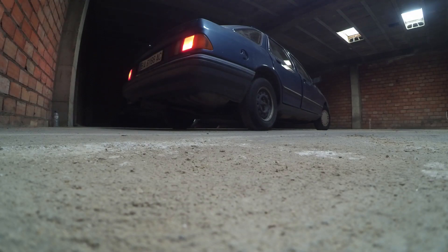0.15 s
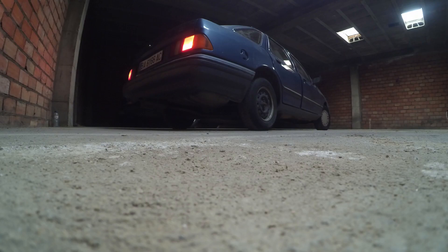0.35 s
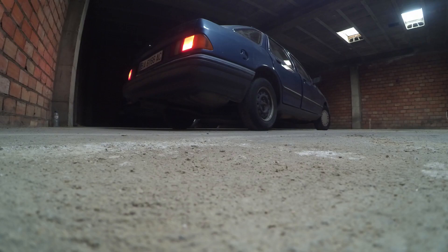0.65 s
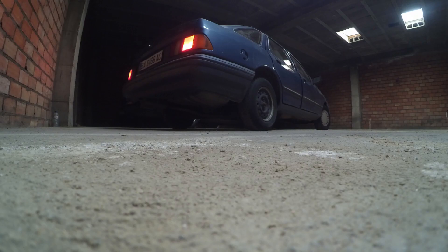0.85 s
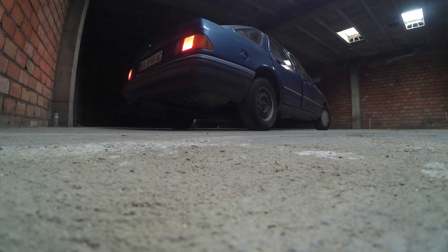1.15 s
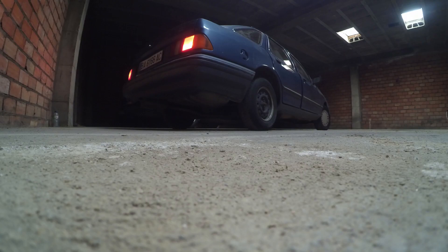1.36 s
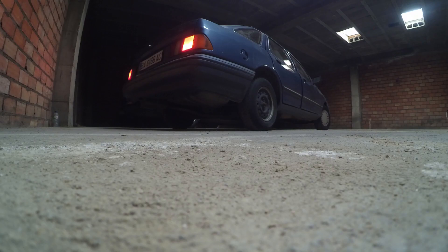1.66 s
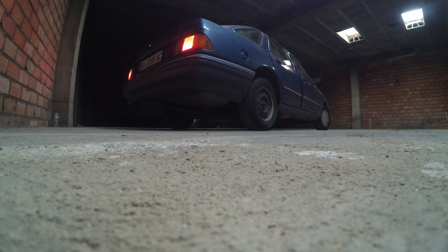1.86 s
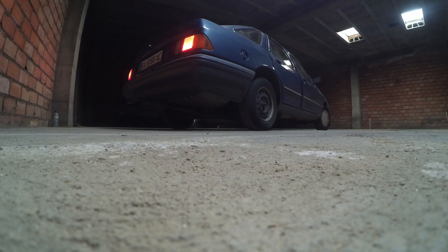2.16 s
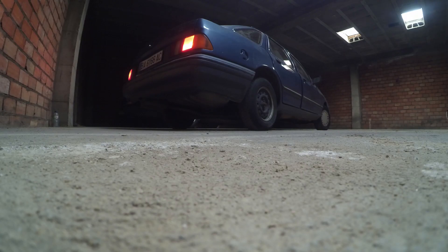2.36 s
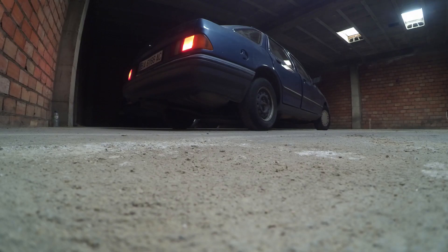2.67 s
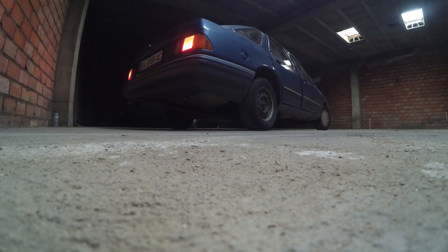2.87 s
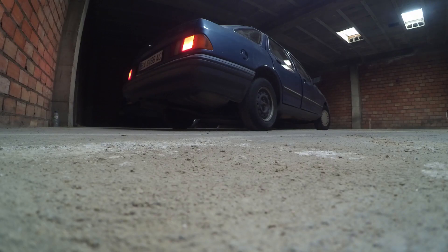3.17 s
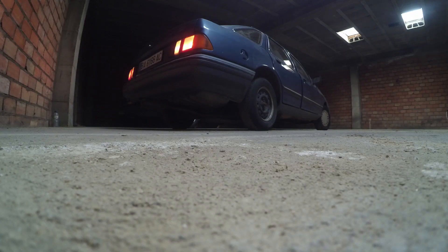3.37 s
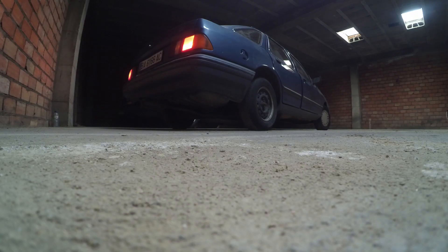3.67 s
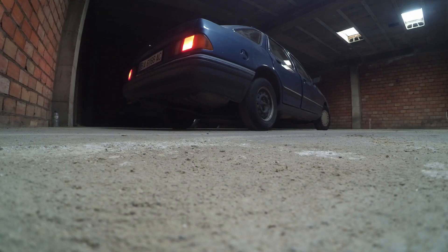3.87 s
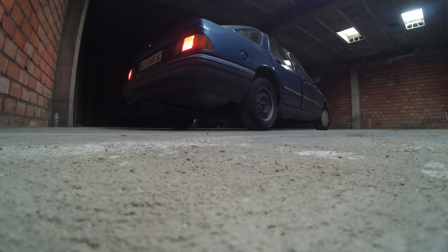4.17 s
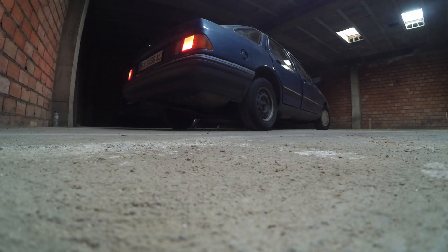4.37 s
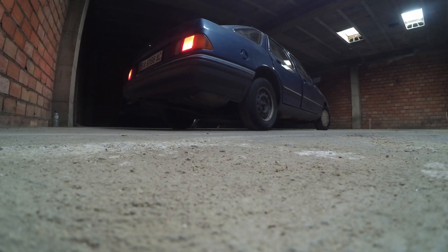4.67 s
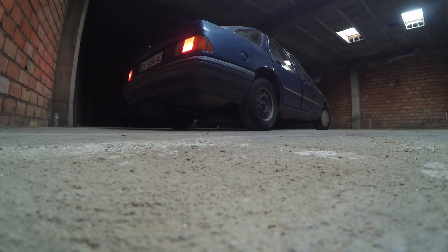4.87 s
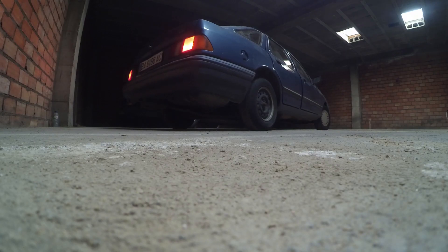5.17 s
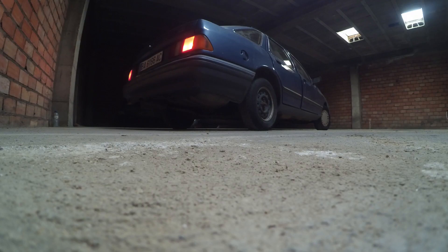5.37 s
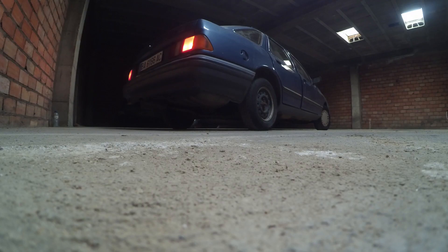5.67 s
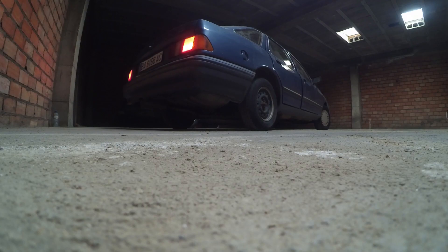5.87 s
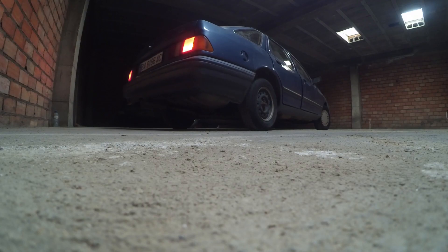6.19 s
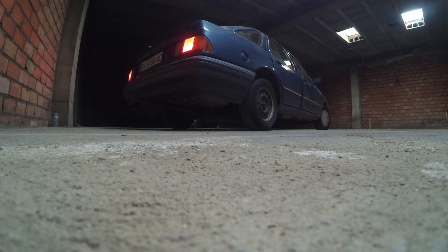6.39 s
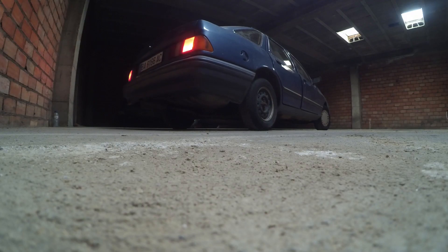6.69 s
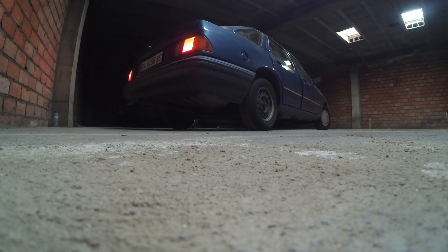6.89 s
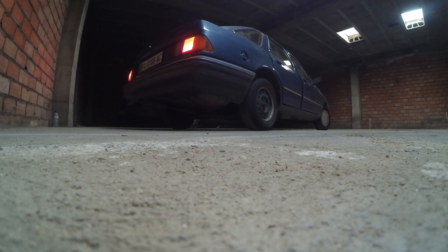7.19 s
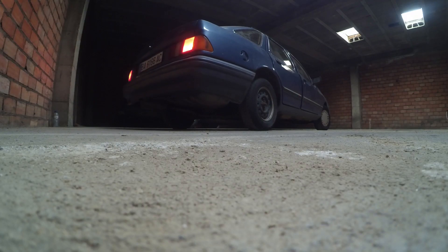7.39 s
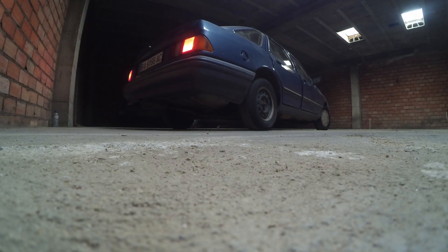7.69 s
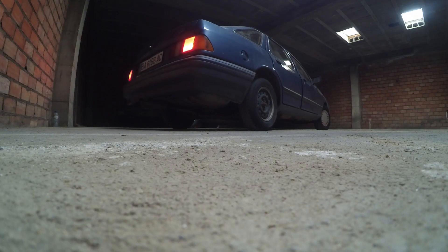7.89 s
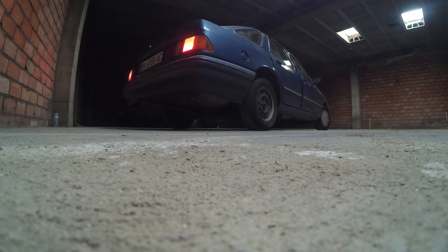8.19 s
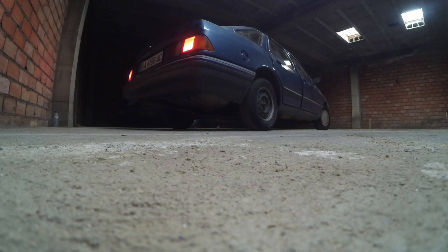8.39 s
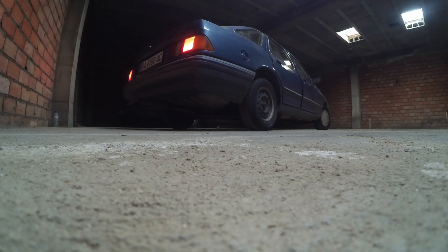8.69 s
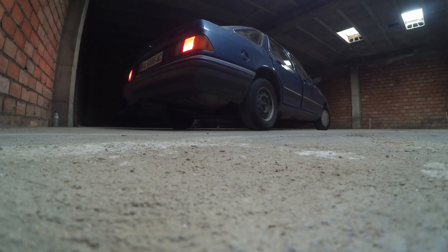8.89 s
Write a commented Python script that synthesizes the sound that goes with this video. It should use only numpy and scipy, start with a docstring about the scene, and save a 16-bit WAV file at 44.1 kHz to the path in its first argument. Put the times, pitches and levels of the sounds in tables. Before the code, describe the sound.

An old petrol engine idles unevenly in a brick garage, sags near stalling, catches with a booming surge, then settles lower before a loud clack.

```python
"""An old four-cylinder petrol engine idles unevenly in a brick garage, heard from the floor behind the car.
First the exhaust booms on multiples of a hunting firing rate, over bay hiss, ticks and a fuzzy whistle.
Filtered noise makes the hiss and scattered clacks of pedals and levers; tones make the boom and whistle.
From about five seconds it sags under load, catches with a burst of boom that clips, and surges.
It settles to a lower idle, and the loudest clacks, noise bursts with a garage echo, come near the end."""
import sys
import numpy as np
from scipy import signal
from scipy.io import wavfile
from scipy.ndimage import uniform_filter1d

SR = 44100
rng = np.random.default_rng(int(sys.argv[2]) if len(sys.argv) > 2 else 0)


def dump(signal):
    """Clip the signal to [-1, 1] and save it as 16-bit WAV at the path in sys.argv[1]."""
    limited = np.clip(np.atleast_2d(signal).T, -1, 1)
    pcm = np.round(limited * 32767).astype(np.int16)
    wavfile.write(sys.argv[1], SR, pcm)


N = 398663

SURGE_S, SURGE_RISE_S, SURGE_FALL_S = 5.96, 0.14, 0.053  # the throttle opens and closes again


def gain_of(db):
    """Decibels to gain."""
    return 10 ** (np.asarray(db) / 20)


def evened(x):
    """Scales to rms 1."""
    return x / np.sqrt(np.mean(x ** 2) + 1e-20)


def read(points, hz):
    """Reads a curve over frequency at hz, straight between points on a log axis."""
    f, value = np.transpose(points)
    return np.interp(np.log(hz + 1), np.log(f + 1), value)


def columns(rows):
    """Draws every column of a table over time as a curve with one value per sample."""
    s, *values = np.transpose(rows)
    return [np.interp(np.arange(N) / SR, s, v) for v in values]


def bump(s, rise, fall):
    """A smooth hump of height 1 around s, with its own half length on each side."""
    t = np.arange(N) / SR - s
    return np.exp(-(t / np.where(t < 0, rise, fall)) ** 2)


def drift(seconds):
    """Slow random wander of rms 1: white noise averaged twice over the given time."""
    size = max(round(seconds * SR), 1)
    once = uniform_filter1d(rng.standard_normal(N), size)
    return evened(uniform_filter1d(once, size))


def colour(x, points, rings=()):
    """Filters by a spectrum with resonant humps, causally (minimum phase) and with unit energy."""
    hz = np.abs(np.fft.fftfreq(65536, 1 / SR))
    humps = sum(d / (1 + (2 * (hz - f) / width) ** 2) for f, width, d in rings)
    db = read(points, hz) + humps
    log_gain = np.log(gain_of(np.maximum(db, -100)))
    phase = -signal.hilbert(log_gain).imag
    taps = np.fft.ifft(np.exp(log_gain + 1j * phase)).real[:32768]
    return signal.oaconvolve(x, taps / np.linalg.norm(taps))[:len(x)]


def whine():
    """A fuzzy whistle: one narrow tone, wavering in pitch and level, that comes and goes."""
    # spells at full level: [start t/s, length/s, level/dB]
    spells = [(0.195, 0.58, -51), (1.06, .12, -49.5), (1.47, 0.07, -45), (1.743, 0.83, -50.5),
              (2.7, 0.32, -49.5), (3.273, .06, -48), (3.694, 0.96, -48)]
    whistle_hz, edge_s = 981, 0.075  # each spell fades in before it and out after it
    t = np.arange(N) / SR
    level = np.zeros(N)
    for s, length, db in spells:
        inside_s = np.minimum(t - s, s + length - t)
        level += gain_of(db) * np.clip(inside_s / edge_s + 1, 0, 1) ** 2
    cycles = np.cumsum(whistle_hz * (1 + 0.0054 * drift(0.0285))) / SR
    return level * gain_of(2.2 * drift(0.026)) * np.sqrt(2) * np.sin(2 * np.pi * cycles)


def engine_bay(hz, turns):
    """Belt and intake noise; its treble pulses with each firing, and one valve in four ticks harder."""
    # shape of the bay noise: [f/Hz, relative level/dB per Hz]
    bay_shape = [(110, -28), (190, -8.5), (245, -8.5), (300, -15.5), (450, -11.5), (570, -11), (760, -11),
                 (950, -9), (1900, -20.5), (2700, -21), (3700, -24), (7400, -27), (12000, -41),
                 (14000, -44), (15200, -65)]
    # sheet-metal and garage resonances on it: [f/Hz, width/Hz, height/dB]
    bay_rings = [(235.5, 34, 6), (358.4, 30, 8.5), (653, 77, 6.5), (772, 6.2, 3), (860, 6.7, 5.5),
                 (1131, 35, 3.5), (1311, 15, 6.5), (1497, 77, 4.5), (1765, 24, 7.5), (1996, 45, 3),
                 (2600, 60, 2), (2770, 19, 6.5), (5840, 130, 3), (7430, 230, 2)]
    # the bay falls quiet just before the engine catches: [t/s, level change/dB, half length/s]
    stall_s, stall_db, half = (5.76, -7.5, 0.026)
    # the intake rushes after the firings catch: [t/s, level change/dB, rise/s, fall/s]
    rush_s, rush_db, rise, fall = (6.04, 3.4, 0.16, 0.13)
    level_db = -39.5 + 0.21 * (hz - 36)  # at 36 firings a second, and its change with speed
    level_db = level_db + rush_db * bump(rush_s, rise, fall) + stall_db * bump(stall_s, half, half)
    treble_db = 0.44 - 0.09 * (hz - 36)

    noise = colour(rng.standard_normal(N), bay_shape, bay_rings)
    low = signal.sosfilt(signal.butter(2, 2500, fs=SR, output="sos"), noise)
    # reversed noise keeps the ticks independent of the hiss
    top = signal.sosfilt(signal.butter(3, 6500, "high", fs=SR, output="sos"), noise[::-1])
    middle = signal.sosfilt(signal.butter(2, (300, 2000), "band", fs=SR, output="sos"), noise)
    middle_level = np.sqrt(np.mean(middle ** 2))

    firing_chance, valve_chance = rng.standard_normal((400, 2)).T
    firing_gain = gain_of(3.3 * firing_chance[turns.astype(int)])
    pulse = 0.82 + 0.41 * firing_gain * np.exp(-(turns % 1) / 0.65)
    valve_gain = gain_of(3 * valve_chance[(turns // 4).astype(int)])
    tick = 1.3 * valve_gain * np.exp(-(turns % 4) / 0.9)

    hiss = (noise - low) * evened(pulse) * gain_of(treble_db + 0.44 * drift(0.041))
    wavering_low = low * gain_of(drift(0.014))
    return gain_of(level_db) * (wavering_low + hiss + top * tick) / middle_level


def garage(x):
    """Echo of the room: sparse taps of random sign, each band dying at its own speed."""
    # reverberation: [f/Hz, t60/s]
    decay = [(200, 0.64), (1000, 0.72), (4000, 0.4), (12000, 0.29)]
    taps = np.zeros(SR)
    at = np.arange(300, SR - 20, 20)
    taps[at + rng.integers(0, 20, len(at))] = rng.choice([-1., 1.], len(at))
    hz, t, z = signal.stft(taps, SR, nperseg=256)
    fade_db = -60 * t / read(decay, hz)[:, None]
    tail = signal.istft(z * gain_of(fade_db), SR, nperseg=256)[1]
    return signal.fftconvolve(x, tail / np.linalg.norm(tail))[:N]


def clacks():
    """Pedals and levers: each clack is a short rattle of metal parts and a thud of the panels."""
    # hits, levels before the envelope: [t/s, bright level/dB, body over bright/dB, decay time constant/s]
    hits = [(3.289, -33, -8, 0.0084), (3.324, -29, 1.5, 0.013), (3.871, -37.5, 10, 0.017),
            (4.853, -32.5, 0, 0.011), (4.889, -35.5, 6, 0.012), (5.693, -40, -4, 0.027),
            (5.887, -36, 4, 0.01), (6.54, -39, 5, 0.0088), (7.815, -56, 32, 0.0087), (8.157, -48, 19, 0.04),
            (8.197, -26.5, 5, 0.019), (8.207, -20, 4, 0.02), (8.225, -22.5, 4.5, 0.019),
            (8.254, -24.5, 5, 0.021), (8.286, -31.5, 0.5, 0.045)]
    # bright part of a clack: [f/Hz, relative level/dB per Hz]
    metal = [(710, -24.5), (1200, -14), (1510, -2.5), (1650, -2), (2020, 2), (3570, -4.5), (4010, -2.5),
             (4800, -2.5), (5690, -1.5), (6670, -4), (15100, -23)]
    # resonances of the metal: [f/Hz, width/Hz, height/dB]
    metal_rings = [(3920, 350, 5), (5700, 560, 3)]
    # panel thud: [f/Hz, relative level/dB per Hz]
    body = [(90, -12), (140, -4), (185, -6), (230, 0), (270, -7), (330, 0.5), (390, 1), (430, -3), (480, 0),
            (600, -5), (850, -7), (1200, -12), (1700, -18), (2600, -36)]
    bright, dull, t = np.zeros(N), np.zeros(N), np.arange(8000) / SR
    attack = np.minimum(t / 0.0055, 1) ** 1.9
    for s, db, body_db, length in hits:
        at = round(s * SR)
        rattle = rng.standard_normal(len(t)) * attack * np.exp(-t / max(length, 0.001))
        bright[at:at + len(t)] += gain_of(db) * rattle
        dull[at:at + len(t)] += gain_of(db + body_db) * rattle
    return colour(bright, metal, metal_rings) + colour(dull, body)


def standing_waves(hz):
    """The garage's lowest tones, stirred by rough combustion, and low tones that ring on."""
    # irregular combustion between the lines: [f/Hz, relative level/dB per Hz]
    rumble_shape = [(8, -21), (18, -7), (36, 0.5), (60, 2.5), (100, 4), (130, -5.5), (200, -16.5),
                    (300, -45)]
    # standing waves on it, humps and slight dips: [f/Hz, width/Hz, height/dB]
    modes = [(17.3, 4.3, 1), (35.4, 1.8, -1), (51.6, 3.6, 16.5), (70.7, 2.2, -1)]
    # gain on the deep part of the rumble: [t/s, gain/dB]
    deep_gain = [(0, -33), (4.7, -13), (5, -22), (6, -17), (6.4, -22), (7.5, -20), (9.04, -26)]
    # low tones that start as the speed changes and ring on, near the firing rate or its multiples
    # and half: [start t/s, f/Hz, level before decay/dB, t60/s]
    ring_on = [(4.931, 50, -10, 0.75), (5.4, 65, -16, 0.78), (6.199, 35.6, -16.5, 2.2), (6.2, 17, -35, 2.1),
               (6.203, 67, -14, 0.67)]
    rumble = colour(rng.standard_normal(N), rumble_shape, modes)
    deep = signal.sosfiltfilt(signal.butter(4, 57, fs=SR, output="sos"), rumble)
    # the rest of the rumble falls towards the lower idle and swells through stumble and surge
    rough_db = -30 + 1.3 * (np.maximum(hz, 29) - 36)
    rough_db = rough_db + 13 * bump(SURGE_S, 6 * SURGE_RISE_S, SURGE_FALL_S)
    out = gain_of(columns(deep_gain)[0]) * deep + gain_of(rough_db) * (rumble - deep)
    for s, ring_hz, db, t60 in ring_on:
        t = np.maximum(np.arange(N) / SR - s, 0)
        envelope = gain_of(db - 60 * t / t60) * np.minimum(t / 0.05, 1)
        out = out + np.sqrt(2) * envelope * np.sin(2 * np.pi * ring_hz * t)
    return out


def overload_gain():
    """Brief gain on the exhaust that drives the boom into clipping."""
    # the burst of boom: [t/s, extra level/dB, half length/s]
    s, db, half = (5.924, 4.2, .016)
    return gain_of(db * bump(s, half, half))


def boom_levels(hz):
    """Levels in dB of the low multiples, as pipe and garage favour each speed, with dips and the surge."""
    # response: [firing rate f/Hz, then level/dB at 1, 2, 3, 1.5 and 0.5 times the rate]
    response = [(19.75, -15, -22.5, -17.5, -54, -41), (20.94, -16.5, -26, -13.5, -47, -45),
                (22.15, -33, -24.5, -25, -37, -57), (24.24, -23, -7, -21, -34, -55),
                (26, -19, -6.5, -22, -38, -43), (27.6, -35, -6, -20.5, -38.5, -35),
                (29.16, -27, -6.5, -18, -49, -42), (30.1, -52, -9, -19.5, -47, -42),
                (30.53, -54, -13, -24, -42, -41), (31.5, -14.5, -35, -27, -30, -31),
                (33.2, -21, -9.5, -24, -29, -27), (33.76, -12, -13, -21, -26, -31),
                (34.72, -10, -15, -21.5, -36.5, -36), (35.3, -10.5, -19.5, -22.5, -34, -47),
                (37.1, -12.5, -27.5, -23.5, -31, -43)]
    # dips of the lowest boom: [t/s, level change/dB, fall/s, recovery/s]
    boom_dips = [(1.14, -15, 0.23, .15), (1.86, -3.5, 0.1, 0.12), (3.28, -10, 0.12, .4)]
    lag_s = 0.039  # the garage answers a fall in speed late
    t = np.arange(N) / SR
    rate, *levels = np.transpose(response)
    heard_hz = np.maximum(np.interp(t - lag_s, t, hz), hz)
    first, second, third, uneven, half = (np.interp(heard_hz, rate, v) for v in levels)
    for s, db, fall, back in boom_dips:
        first = first + db / (1 + ((t - s) / np.where(t < s, fall, back)) ** 2)
    surge_uneven_db = 16.5 * bump(SURGE_S, SURGE_RISE_S, SURGE_FALL_S)
    return first, second, third, uneven + surge_uneven_db, half


def exhaust(hz, turns, first_db, second_db, third_db, uneven_db, half_db):
    """Clean multiples of the firing rate and half multiples from unequal cylinders."""
    # fourth and higher multiples after pipe and garage, before the trims below: [f/Hz, level/dB]
    pipe = [(78, -31), (92, -22), (101, -25), (111, -25), (117, -24.5), (123, -34.5), (136, -39.5),
            (144.5, -47), (148, -33), (153, -30.5), (168, -36.5), (186, -47), (207, -61), (222, -45.5),
            (237, -48.5), (243, -51.5), (255, -50), (300, -61)]
    # higher half multiples: [multiple of the firing rate, level over the one at 1.5/dB]
    halves = [(2.5, -15), (3.5, -24.5), (4.5, -20)]
    # a standing wave delays the lowest boom as the firing rate climbs through it
    lowest_hz, lowest_half_hz, memory_s = 35.2, 1.0, 0.25
    slow_hz = uniform_filter1d(hz, round(memory_s * SR))
    lowest_lag = 1 + 1.3 * np.arctan((slow_hz - lowest_hz) / lowest_half_hz)

    def tone(multiple, db):
        """One multiple of the firing rate at an rms level in dB, with its phase lag."""
        lag = np.pi / 3 * multiple ** 2  # pipe and garage smear each firing: higher multiples lag more
        if multiple > 3.9:
            lag = lag - 1.4
        if multiple == 1:
            lag = lag + lowest_lag
        return np.sqrt(2) * gain_of(db) * np.cos(2 * np.pi * multiple * turns - lag)

    boom = tone(1, first_db) + tone(2, second_db) + tone(3, third_db)
    boom += tone(1.5, uneven_db) + tone(0.5, half_db)
    fast_db = -3 * np.clip((hz - 34) / 2, 0, 1)  # the fourth multiple thins out at the fastest idle
    boom += tone(4, read(pipe, 4 * hz) + fast_db)
    dull_db = -2.2 * np.maximum(27 - hz, 0)  # slow, weak firings are blunter
    for k in range(5, 11):
        boom += tone(k, read(pipe, k * hz) + dull_db)
    for k, db in halves:
        boom += tone(k, uneven_db + db)
    return boom


def scene():
    """Exhaust, standing waves, engine bay, whistle and the clacks with their echo, on one speed curve."""
    # hunting idle, sag under load, surge, lower idle: [t/s, firing rate f/Hz]
    speed = [(0, 36.0), (.15, 35.4), (.27, 36.7), (.55, 36.3), (1.08, 37.3), (1.19, 35.9), (1.28, 36.8),
             (1.5, 35.7), (1.62, 36.8), (1.78, 36.8), (1.93, 35.1), (2.17, 36.0), (2.28, 35.4),
             (2.52, 35.4), (2.64, 34.3), (2.77, 35.1), (3.05, 33.8), (3.52, 33.7), (3.65, 35.0),
             (3.85, 34.5), (4.15, 35.4), (4.3, 35.4), (4.4, 34.4), (4.72, 34.9), (4.83, 33.9), (5.0, 28.4),
             (5.12, 26.2), (5.5, 21.0), (5.7, 19.7), (5.84, 21.1), (5.98, 31.6), (6.05, 34.7), (6.26, 30.2),
             (6.5, 29.2), (6.7, 30.4), (6.95, 30.4), (7.45, 29.9), (7.6, 30.3), (7.83, 29.6), (8.07, 30.1),
             (8.57, 29.2), (9.04, 29.5)]
    hz = columns(speed)[0]
    stumble = np.clip((30 - hz) / 6, 0, 1)  # below idle speed the firings come unevenly
    # running count of firings, with timing jitter
    turns = np.cumsum(hz) / SR + 0.3 + (0.008 + 0.015 * stumble) * drift(0.04)
    hits = clacks()
    boom = exhaust(hz, turns, *boom_levels(hz)) * overload_gain()
    engine = boom + standing_waves(hz) + engine_bay(hz, turns) + whine()
    return (engine + hits + gain_of(-1) * garage(hits))[None]


def record(dry):
    """Clips whatever passes full scale, then cuts everything above the band limit."""
    edge_hz = 15250
    low_pass = signal.firwin(2047, edge_hz, window=("kaiser", 9), fs=SR)
    return signal.oaconvolve(np.clip(dry, -1, 1), low_pass[None], "same")


dry = scene()
out = record(dry)
dump(out)
```